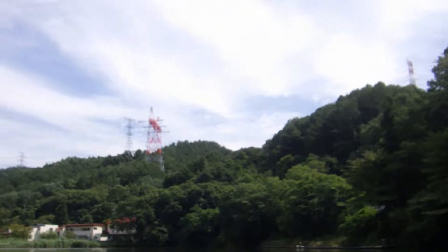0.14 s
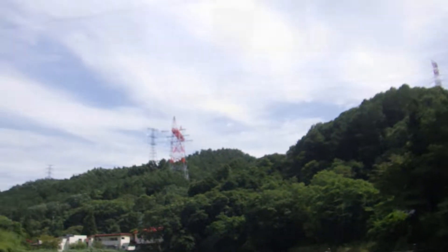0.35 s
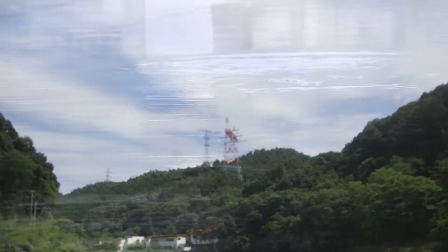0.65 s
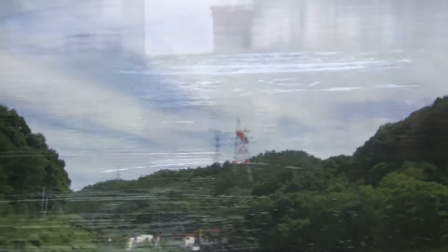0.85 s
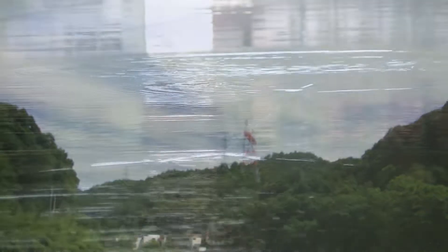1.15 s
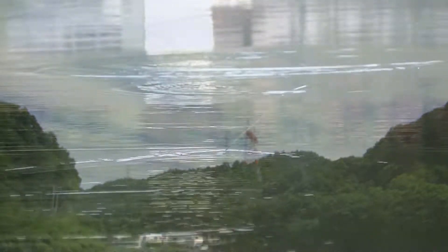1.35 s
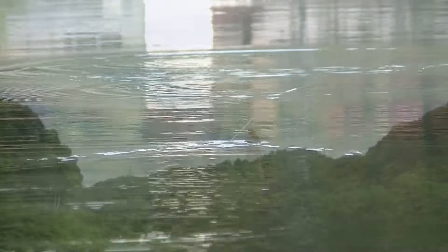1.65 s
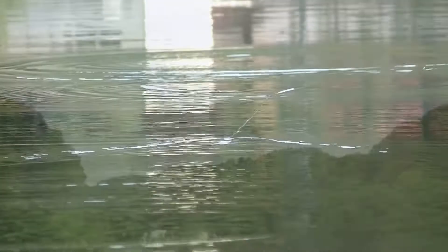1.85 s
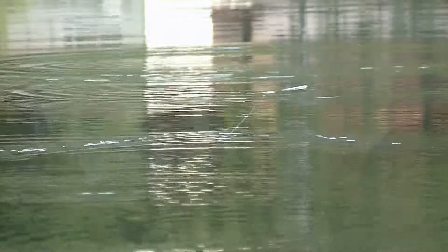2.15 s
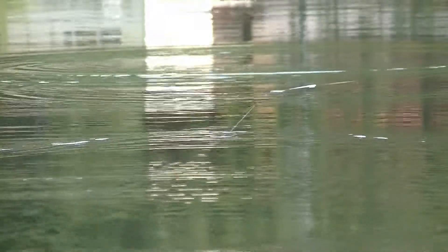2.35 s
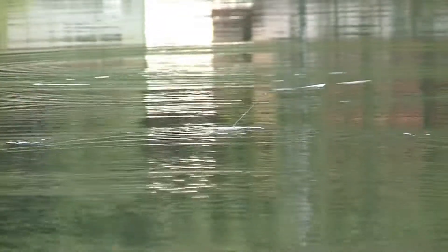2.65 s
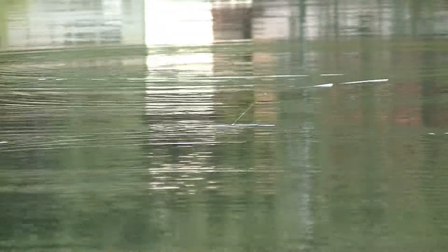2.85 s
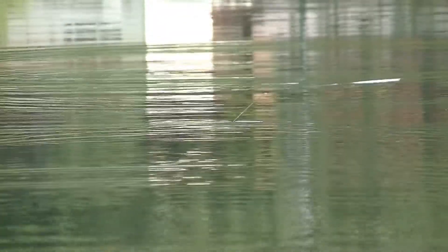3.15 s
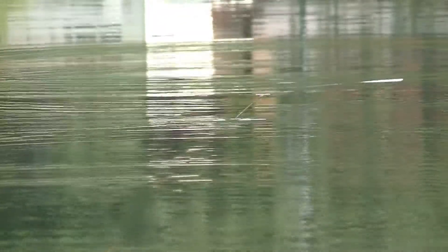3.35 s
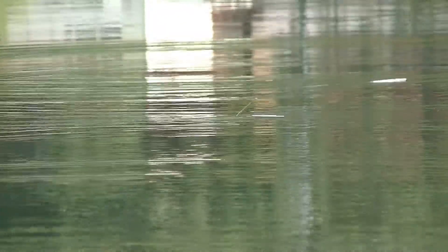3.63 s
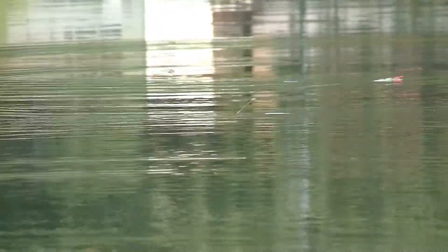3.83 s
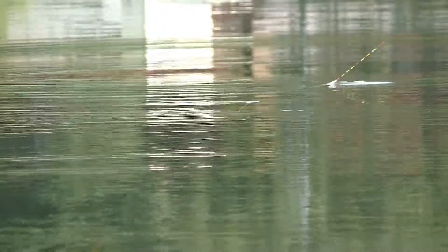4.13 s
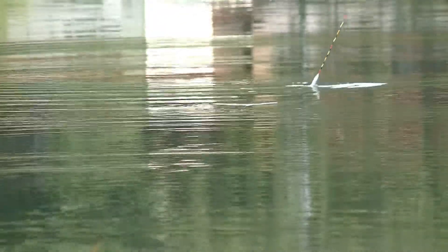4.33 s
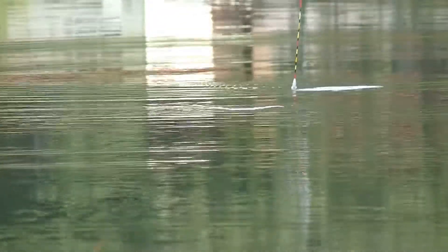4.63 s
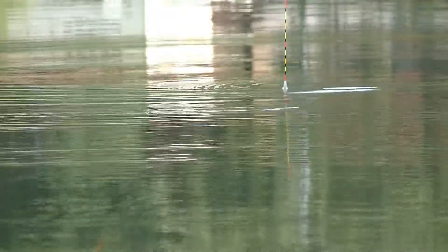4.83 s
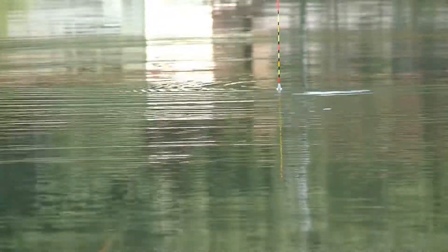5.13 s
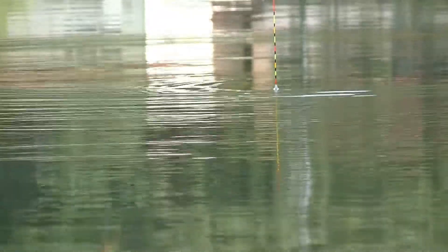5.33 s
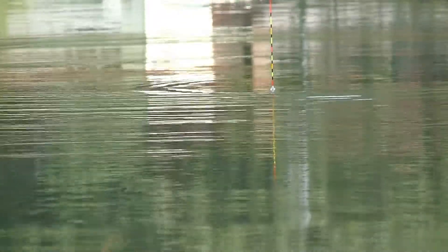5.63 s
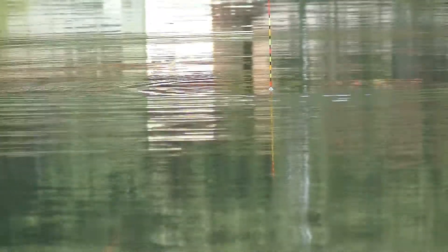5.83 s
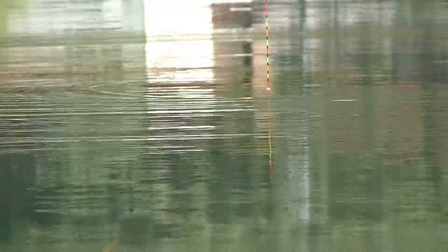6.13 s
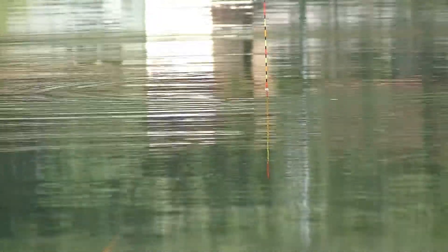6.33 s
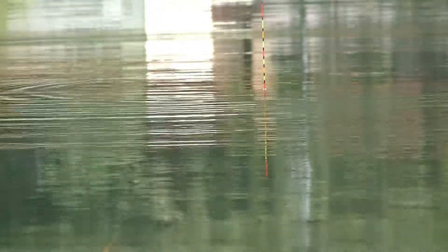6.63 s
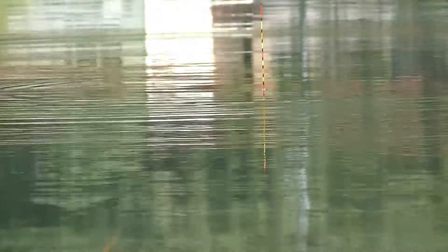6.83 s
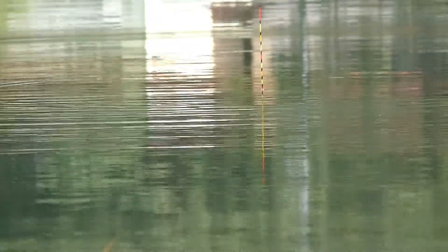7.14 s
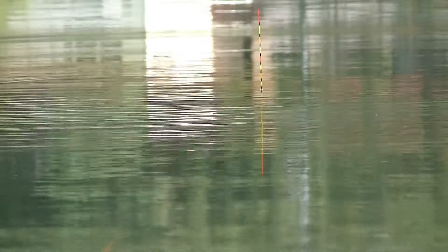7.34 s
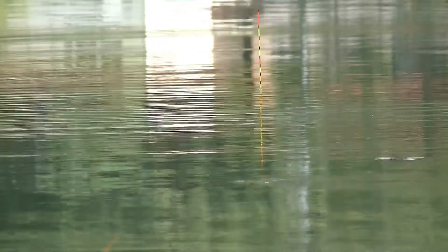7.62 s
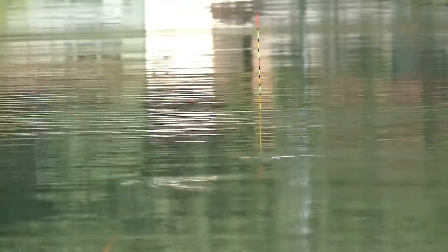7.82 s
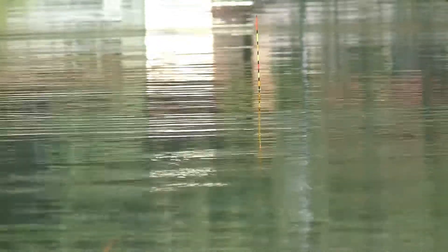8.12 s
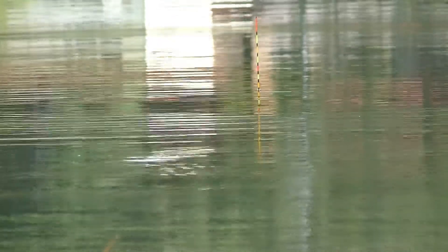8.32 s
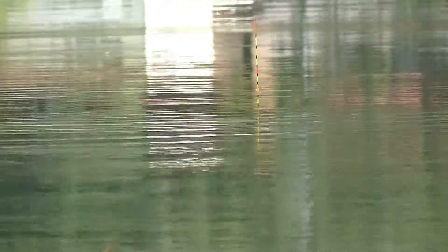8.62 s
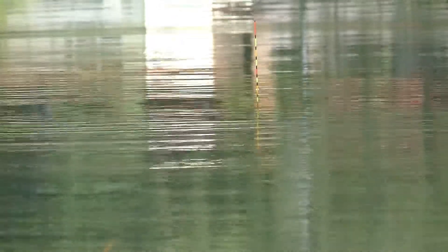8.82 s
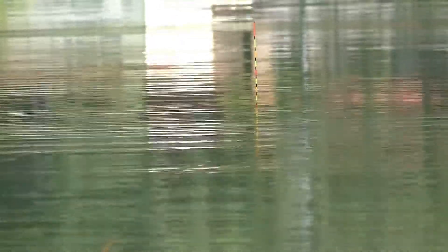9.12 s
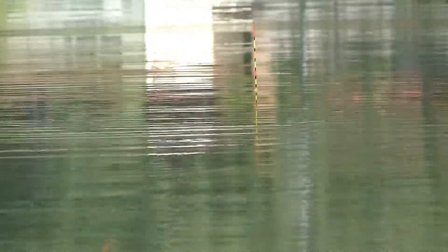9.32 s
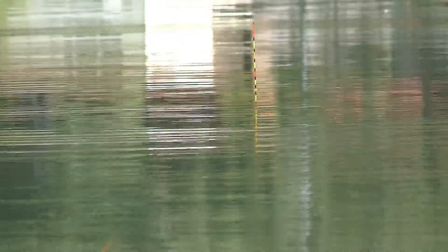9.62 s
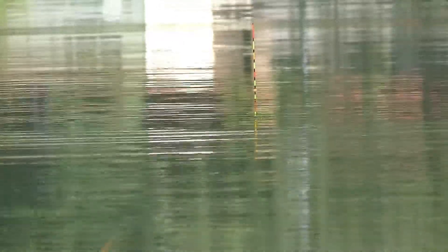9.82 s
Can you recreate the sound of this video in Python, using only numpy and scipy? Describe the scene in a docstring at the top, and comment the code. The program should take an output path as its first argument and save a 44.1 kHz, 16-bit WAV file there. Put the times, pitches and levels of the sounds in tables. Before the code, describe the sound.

A dull, rattling insect chorus sounds over a low rush of air and a distant motor's hum. Within about two seconds these fade, with a few small clicks and dull thumps, as brighter cicadas swell in beside a wooded lake. One close cicada throbs with a quickly sweeping pitch while others buzz, rattle and call farther off. The high chorus continues steadily over soft distant air, leaning to the left.

```python
"""Summer cicadas round a wooded lake

A dull chorus, a low rush and a far motor's hum fade out, with a few thumps, as the lakeside swells.
There a near cicada throbs and sweeps its pitch while others buzz, rattle and call behind it.
A cicada sings by buckling its tymbal, a stiff patch of skin: each click makes its abdomen ring.
Soft distant air lies underneath, and there are a few small clicks and one brief swish."""
import sys
import numpy as np
from scipy import signal
from scipy.fft import rfft, irfft, next_fast_len
from scipy.io import wavfile
from scipy.ndimage import map_coordinates

SR = 44100
rng = np.random.default_rng(int(sys.argv[2]) if len(sys.argv) > 2 else 0)


def master_out(mix):
    """Clip the mix to full scale and print it as 16-bit PCM to the path in sys.argv[1]."""
    frames = np.transpose(np.atleast_2d(mix))
    ceiling = np.clip(frames, -1, 1)
    pcm = np.round(ceiling * 32767).astype(np.int16)
    wavfile.write(sys.argv[1], SR, pcm)


N = 439677
TIME = np.arange(N) / SR
CREEP_PER_S = .0024  # the near cicada and its neighbours click faster by this share each second


def amp(db):
    """Turn decibels into a gain."""
    return 10 ** (np.asarray(db) / 20)


def unit(x):
    """Scale a sound to an average (rms) level of 1."""
    return x / np.sqrt(np.mean(x ** 2) + 1e-20)


def along(rows, hz, column=1):
    """Read a frequency table between its rows, on a log scale."""
    rows = np.asarray(rows)
    return np.interp(np.log(hz + 1), np.log(rows[:, 0] + 1), rows[:, column])


def wobble(rate):
    """A smooth curve through `rate` random values a second."""
    return map_coordinates(rng.standard_normal(int(N * rate / SR) + 4), [TIME * rate])


def bell(peak_s, width_s):
    """A smooth swell that reaches 1 at peak_s."""
    return np.exp(-.5 * ((TIME - peak_s) / width_s) ** 2)


def arch(start_s, length_s):
    """Half a sine wave, silent before and after."""
    progress = (TIME - start_s) / length_s
    return np.abs(np.sin(np.pi * progress)) * (progress > 0) * (progress < 1)


def filtered(x, response):
    """Scale each frequency in x by response(hz)."""
    size = next_fast_len(N + 8192)
    return irfft(rfft(x, size) * response(np.fft.rfftfreq(size, 1 / SR)), size)[..., :N]


def noise(colour, channels=1):
    """Noise at level 1, with its tone shaped by a table."""
    return unit(filtered(rng.standard_normal((channels, N)), lambda hz: amp(along(colour, hz))))


def trees(x, wet_db, t60):
    """Trees scatter a sound into two echo tails that fall 60 dB in t60 seconds."""
    t = TIME[:SR // 3]
    tails = rng.standard_normal((2, len(t))) * amp(-60 * t / t60)
    tails *= amp(wet_db) / np.linalg.norm(tails[0])
    tails[0, 0] += 1  # the direct sound
    return signal.fftconvolve(x[None], tails / np.linalg.norm(tails[0]), axes=1)[:, :N]


def beats(rate, scatter_db):
    """For a run of clicks: the time since the latest one, and its strength."""
    turns = np.cumsum(rate * np.ones(N)) / SR + rng.random()
    sizes = amp(scatter_db * rng.standard_normal(8192))
    return turns % 1 / rate, sizes[turns.astype(int) % len(sizes)]


def tymbal(rate, ring_hz, decay_s, scatter_db):
    """Each buckling of the tymbal rings the abdomen, and the ring dies away."""
    age, size = beats(rate, scatter_db)
    return unit(size * age / decay_s * np.exp(-age / decay_s) * np.sin(2 * np.pi * ring_hz * age))


# tone of the dull chorus: f/Hz, level/dB
DULL_TONE = [(1500, -17), (2600, -15), (3700, -13), (4450, 0.5), (4900, -1.5), (5450, -5.5), (6200, -5),
             (6800, -13.5), (7600, -16.5), (8700, -29), (10200, -24.5), (12000, -31), (15500, -33)]
# tone of the low rush: f/Hz, level/dB
RUSH_TONE = [(15, -35), (25, -11), (98, -4.5), (119, -15), (145, -14), (166, -16.5), (262, -25.5),
             (345, -19.5), (589, -23.5), (909, -24), (2800, -40.5), (3640, -69), (6160, -120)]
# gaps that make the tone hollow: f/Hz, width/Hz
TONE_GAPS = [(3210, 230), (4080, 130), (5140, 130), (5680, 160), (7140, 100)]
def dull_chorus(chorus_db=-49.5, rush_db=-45.5):
    """A hollow-sounding chorus with a fast rattle in it, over a low rush of air."""
    def hollow(hz):
        return np.prod([1 - .94 * np.exp(-((hz - f) / width) ** 2) for f, width in TONE_GAPS], axis=0)
    rattle = unit(amp(2.2 * np.sin(2 * np.pi * 46.5 * TIME + .3 * wobble(4))))
    chorus = amp(chorus_db) * rattle * noise(DULL_TONE)
    rush = amp(rush_db) * noise(RUSH_TONE)
    return filtered(chorus + rush, hollow)


# the motor's hum tones: f/Hz, level/dB, change while it labours/dB
HUM_TONES = [(51.1, -44.5, -1.5), (93.4, -49.5, 8)]
def motor():
    """A far motor hums two wavering tones, labours briefly and then eases."""
    labour = bell(peak_s=.2, width_s=.24)
    hum = 0
    for hz, db, change_db in HUM_TONES:
        level = amp(db + change_db * labour - .5 * wobble(12.74))
        hum += level * unit(np.sin(2 * np.pi * hz * TIME + .27 * wobble(12.5)))
    return hum


# how the near cicada's body shapes its tone: f/Hz, level/dB
BODY_TONE = [(4000, -3), (5700, 2), (6250, -5), (6550, -1), (7300, 0), (7700, -5), (8500, -7), (9500, -18),
             (11800, -16), (13700, -2), (14500, -3), (15400, 0)]
def near_cicada(click_hz=194.2, ring_hz=6950, sweep_hz=1130, decay_s=.00042, overtone_db=-7.3):
    """The pumping abdomen sweeps the ring up and down; at its tightest a hissy octave flashes."""
    fresh = np.exp(-TIME / 2.85)  # falls towards 0 as the insect warms up
    throb_hz = 14.89 - 1.3 * fresh
    level = amp(-49.5 + 4.5 * fresh)
    pump = np.pi + 2 * np.pi * np.cumsum(throb_hz) / SR  # starts slack
    tight = np.cos(pump)
    rate = click_hz * (1 + CREEP_PER_S * TIME)
    age, size = beats(rate * (1 + .001 * wobble(12) + .0015 * wobble(300)), scatter_db=1)
    phase = 2 * np.pi * (ring_hz + sweep_hz * tight + 130 * wobble(150)) * age
    strike = size * age / decay_s * np.exp(-age / decay_s)
    # loudest in mid-stroke, more so on the way up; no two strokes are equally strong
    stroke_db = -1.6 * np.cos(2 * pump) - np.sin(pump) - 1.5 * tight
    effort = amp(stroke_db + .5 * wobble(15) + .6 * wobble(3))
    ring = unit(effort * strike * np.sin(phase + .3 * wobble(1800)))
    overtone = unit(amp(2.5 * tight) * strike * np.sin(2 * phase + wobble(2500)))
    song = filtered(ring + amp(overtone_db) * overtone, lambda hz: amp(along(BODY_TONE, hz)))
    return trees(level * unit(song), wet_db=-2.3, t60=.075)


# each neighbour at its loudest: t/s, click rate/Hz, throb rate/Hz, ring f/Hz, relative level/dB
NEIGHBOUR_SONGS = [(4.6, 182.4, 14.5, 5820, -54), (5.6, 189.2, 13.4, 5480, -54.5),
                   (8.4, 204.2, 15, 5700, -53), (2.2, 202.8, 13.9, 5350, -56.5),
                   (6.3, 184.6, 13.1, 6500, -59), (7.5, 196.2, 12.4, 5080, -60)]
def neighbours(gain_db=2, swell_depth_db=12):
    """More cicadas, with a longer, purer ring, swell and ebb in turn, each at its own pace."""
    song = 0
    for peak_s, click_hz, throb_hz, ring_hz, db in NEIGHBOUR_SONGS:
        throb_db = 4 * np.sin(2 * np.pi * throb_hz * TIME + .7 * wobble(2)) + .5 * wobble(5) - 1
        swell_db = swell_depth_db * (bell(peak_s, width_s=1.8) - 1)
        rate = click_hz * (1 + CREEP_PER_S * (TIME - peak_s) + .0006 * wobble(4))
        song += amp(db + swell_db + throb_db) * tymbal(rate, ring_hz, decay_s=.0012, scatter_db=.8)
    return amp(gain_db) * trees(song, wet_db=-7, t60=.2)


# tone of the massed far cicadas: f/Hz, level/dB
CHORUS_TONE = [(2000, -37), (3300, -16.5), (3900, -11.5), (4600, -3.5), (5300, 1.5), (6300, -7),
               (7300, -10), (8400, -14), (9300, -24.5), (10300, -29), (11500, -22), (13500, -19),
               (15600, -20)]
def far_chorus(level_db=-45.5):
    """Countless cicadas merge into a shimmering hiss."""
    return amp(level_db + .51 * wobble(14)) * noise(CHORUS_TONE, channels=2)


# tone of the distant air: f/Hz, level/dB
AIR_TONE = [(15, -53), (25, -39), (185, -19), (306, -5), (405, -3.5), (456, -1.5), (525, -3), (816, 1),
            (1970, -8.5), (2510, -7.5), (3000, -6.5), (3900, -26), (6600, -120)]
def distant_air(level_db=-62):
    """A soft, almost steady wash of air."""
    return amp(level_db + .22 * wobble(2.95)) * noise(AIR_TONE, channels=2)


# when the clicks come: t/s, level/dB
CLICK_TIMES = [(1.058, -46), (1.094, -48), (1.104, -53)]
# their tone: f/Hz, level/dB
CLICK_TONE = [(400, -23), (1400, -8), (2300, 4), (3600, -3), (5000, -21), (12000, -40)]
def clicks(t60=.015):
    """Small dry clicks close by: bursts of noise that start sharply and die fast."""
    bursts = sum(amp(db - 60 * np.abs(TIME - t) / t60) * (TIME >= t) for t, db in CLICK_TIMES)
    return bursts * noise(CLICK_TONE)


# when the thumps come: t/s, half length/s, level/dB
THUMP_TIMES = [(1.267, .02, -40.5), (1.434, 0.023, -41.5), (1.705, 0.032, -44.5), (1.786, 0.051, -38.5),
               (1.922, 0.022, -53), (2.105, 0.064, -58)]
# their tone: f/Hz, level/dB
THUMP_TONE = [(15, -20), (35, -6), (60, 4), (95, -7), (140, -11.5), (220, -22), (320, -40), (700, -72)]
def thumps():
    """Dull thumps: short, rounded swells of low noise."""
    return sum(amp(db) * bell(t, width) for t, width, db in THUMP_TIMES) * noise(THUMP_TONE)


# the far cicada's notes: t/s, length/s, click rate/Hz, its rise as a share, ring f/Hz, level/dB
FAR_NOTES = [(2.45, .3, 182, 0, 3950, -63), (5.28, .2, 181, .005, 3650, -59),
             (5.6, .3, 186, .04, 4250, -56), (5.83, .1, 183.5, 0, 3850, -59),
             (6.38, .2, 187.5, .012, 4150, -55), (6.92, .3, 186.5, .005, 4100, -57),
             (7.5, .35, 193, -.015, 3950, -61), (8.05, .95, 122, -.03, 3560, -62.5)]
def far_caller():
    """A cicada buzzes short notes across the water, ending in a longer, lower rasp."""
    song = np.zeros(N)
    waver = 1 + .0012 * wobble(30)
    for start, length, click_hz, rise, ring_hz, db in FAR_NOTES:
        progress = np.clip((TIME - start) / length, 0, 1)
        buzz = tymbal(click_hz * waver * (1 + rise * progress), ring_hz, decay_s=.00095, scatter_db=4.5)
        song += amp(db) * np.sqrt(arch(start, length)) * buzz
    return trees(song, wet_db=4, t60=.3)


# spells of rattling: t/s, length/s, level/dB
RATTLE_SPELLS = [(2.7, 1.2, -62), (3.65, 1.96, -55), (5.452, 0.54, -54), (6.12, 1.23, -55), (7.25, 2, -52),
                 (9.45, .7, -58.5)]
def rattler(chirps_per_s=47.9, ring_hz=4720):
    """An insect rattles in spells of tiny, quick chirps, all near one pitch."""
    effort = sum(amp(db) * arch(start, length) ** .26 for start, length, db in RATTLE_SPELLS)
    age, size = beats(chirps_per_s * (1 + .0015 * wobble(5)), scatter_db=.7)
    chirps = size * np.exp(-.5 * (age / .0011 - 4) ** 2)
    tone = np.sin(2 * np.pi * ring_hz * age + .55 * wobble(1000))
    return trees(effort * unit(chirps * tone), wet_db=-6, t60=.096)


# tone of the swish: f/Hz, level/dB
SWISH_TONE = [(800, -30), (1600, -3), (3000, 4), (8500, -16), (11000, -2), (16000, -25)]
def swish(left_db=-55, right_db=-60):
    """One soft, brief swell of bright noise."""
    return amp([[left_db], [right_db]]) * bell(peak_s=3.67, width_s=.033) * noise(SWISH_TONE)


# the microphone's two openings: f/Hz, left over right/dB, likeness (0 to 1), left delay/radians
MIC_OPENINGS = [(60, 0.5, 0.25, .3), (200, 9.5, 0.52, 1.5), (400, 13, 0.42, 1.25), (1300, 10.5, 0.65, .9),
                (2400, 7, 0.37, 0.74), (4400, 5, 0.69, 0.37), (6650, 8, 0.88, 1.4), (8340, 7, 0.25, 1.7),
                (15000, 1, 0.2, 2.3)]
def stereo(pair):
    """Blend two unrelated signals into left and right; the left is louder and slightly late."""
    def mix(hz):
        lean = amp(along(MIC_OPENINGS, hz))
        alike = np.clip(along(MIC_OPENINGS, hz, column=2), 0, 1)
        turn = np.arccos(alike) / 2
        shared, apart = np.cos(turn), np.sin(turn)
        left = lean * np.exp(-1j * along(MIC_OPENINGS, hz, column=3))
        centre = np.sqrt(lean ** 2 + 1 + 2 * alike * left.real) / 2  # level of the two sides' average
        return np.array([[left * shared, left * apart], [shared, -apart]]) / centre
    return filtered(pair, mix).sum(axis=1)


def scene(fade_start_s=.31, fade_end_s=2.27):
    """The dull chorus and the motor fade out evenly as the lakeside fades in."""
    fade = np.clip((TIME - fade_start_s) / (fade_end_s - fade_start_s), 0, 1)
    insects = near_cicada() + neighbours() + rattler() + far_caller() + far_chorus()
    lakeside = stereo(insects + distant_air())
    opening = dull_chorus() + motor()
    return fade * lakeside + (1 - fade) * opening + thumps() + clicks() + swish()


def record(dry):
    """Cut off the very highest treble."""
    return filtered(dry, lambda hz: hz < 15820)


dry = scene()
out = record(dry)
master_out(out)
```